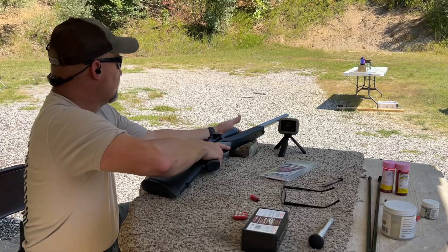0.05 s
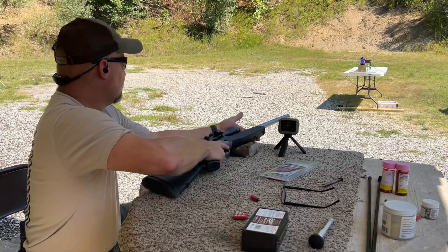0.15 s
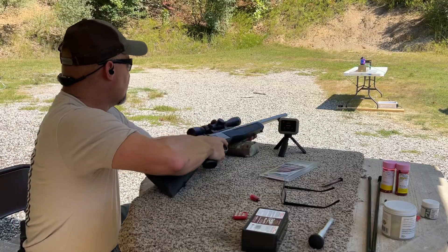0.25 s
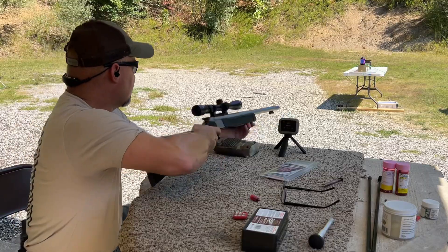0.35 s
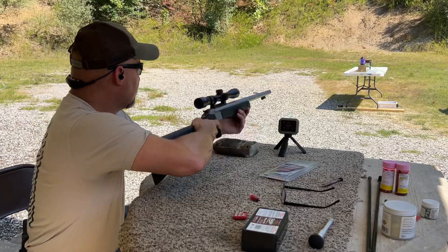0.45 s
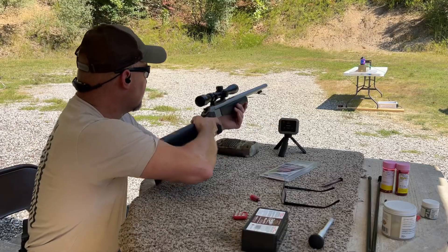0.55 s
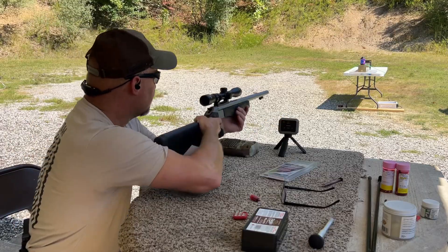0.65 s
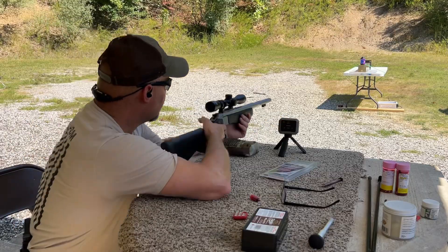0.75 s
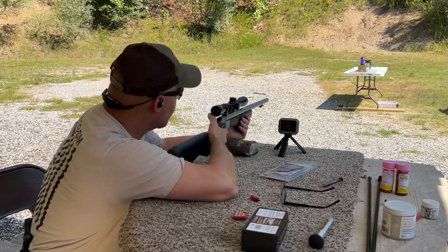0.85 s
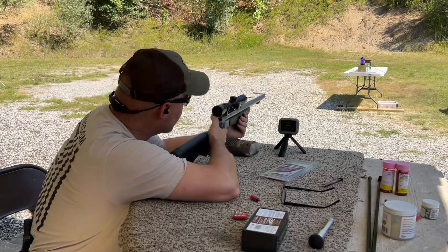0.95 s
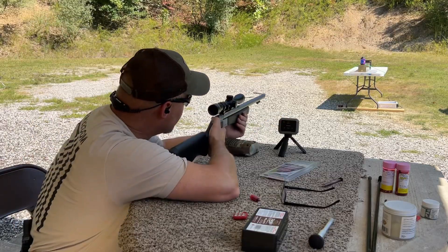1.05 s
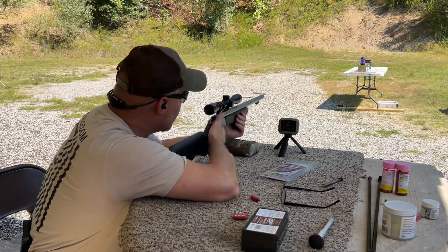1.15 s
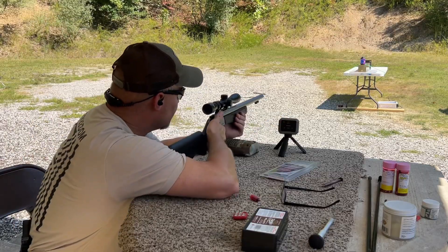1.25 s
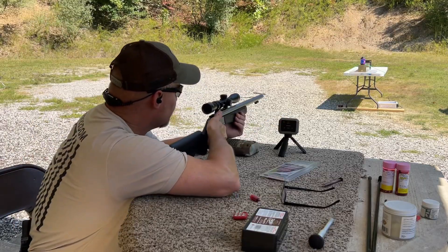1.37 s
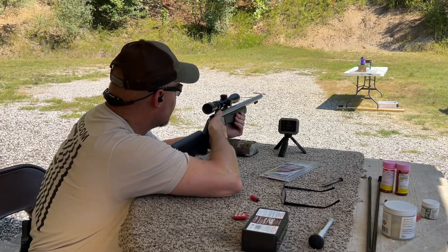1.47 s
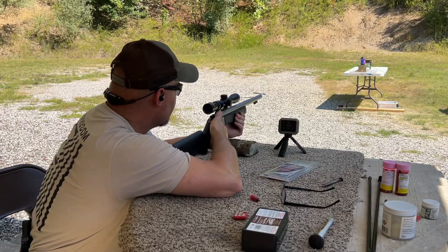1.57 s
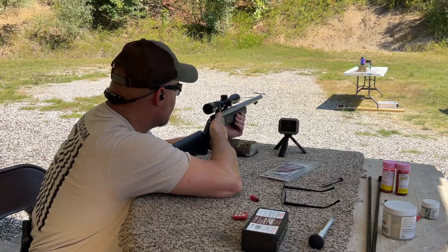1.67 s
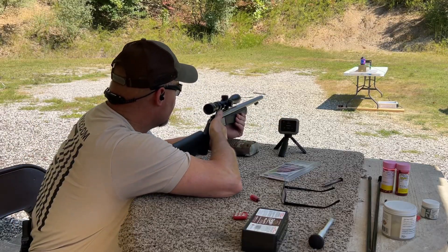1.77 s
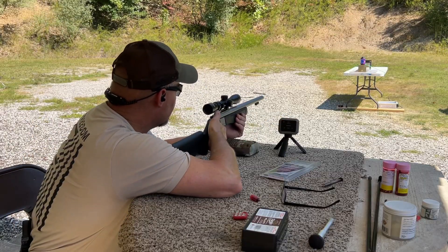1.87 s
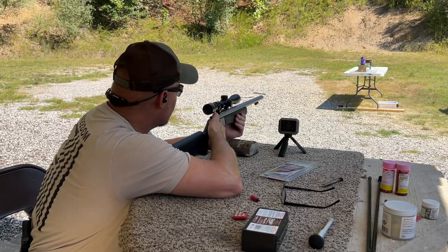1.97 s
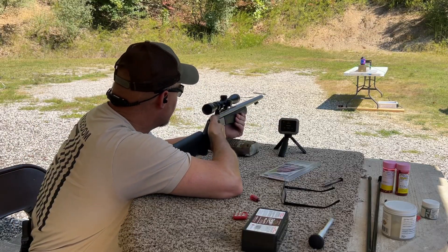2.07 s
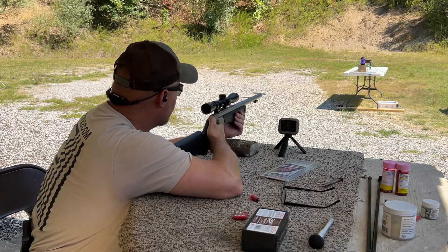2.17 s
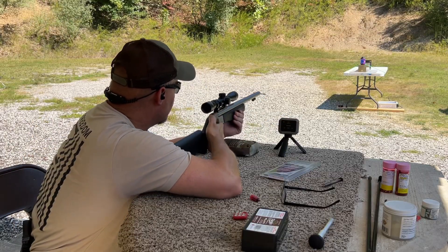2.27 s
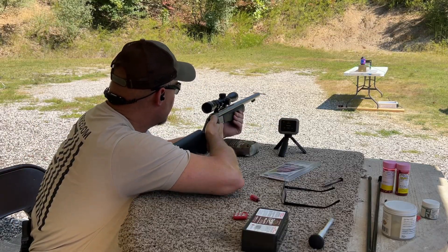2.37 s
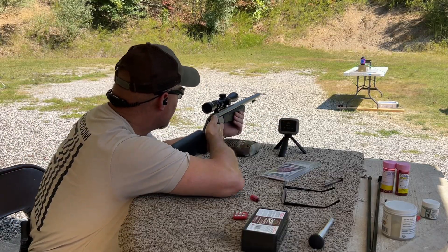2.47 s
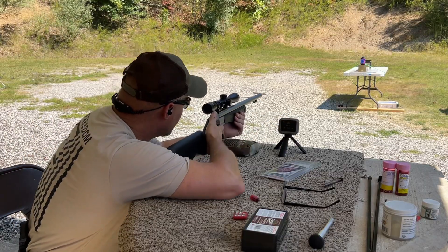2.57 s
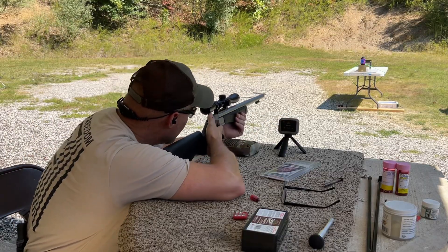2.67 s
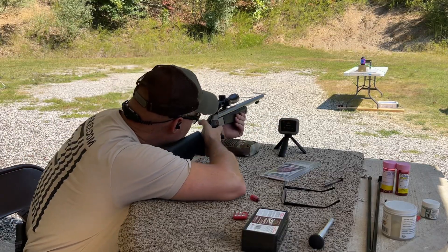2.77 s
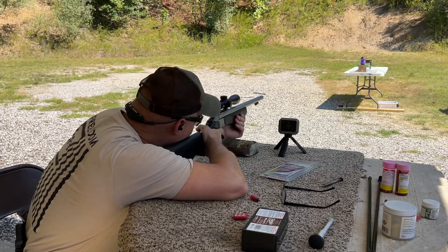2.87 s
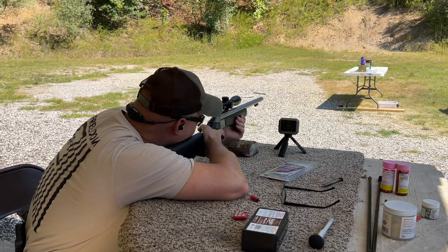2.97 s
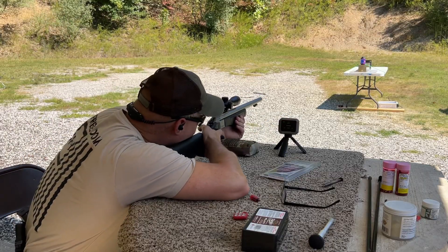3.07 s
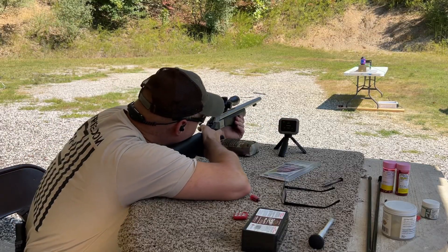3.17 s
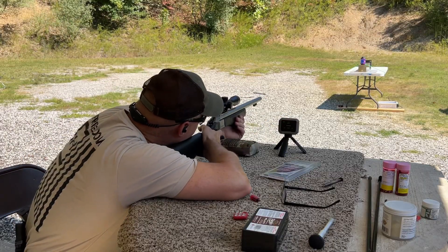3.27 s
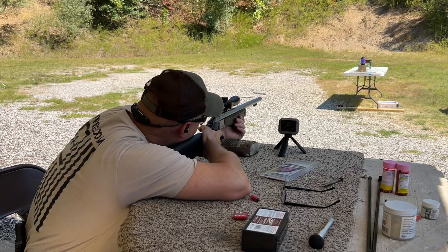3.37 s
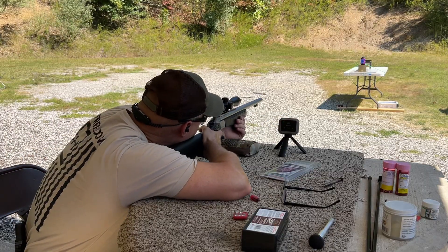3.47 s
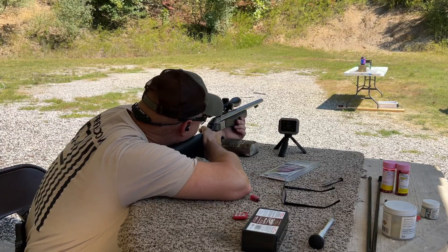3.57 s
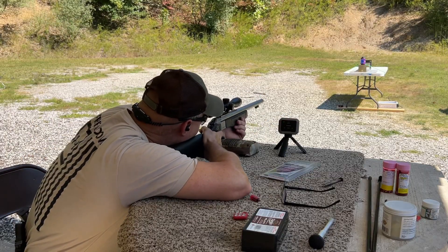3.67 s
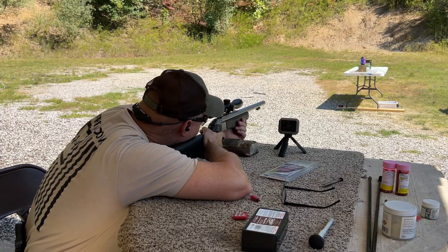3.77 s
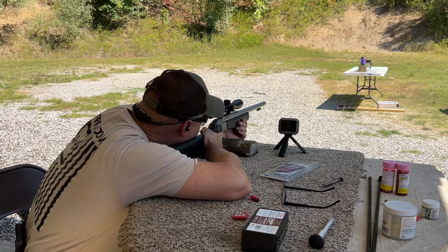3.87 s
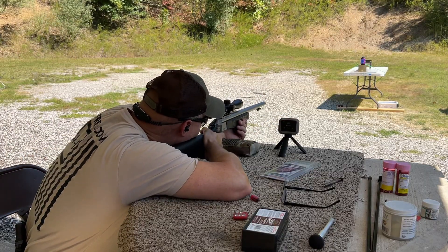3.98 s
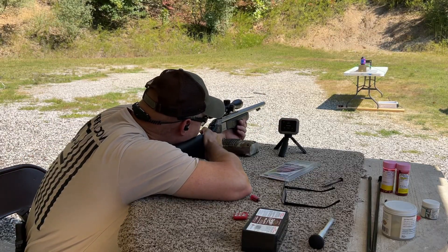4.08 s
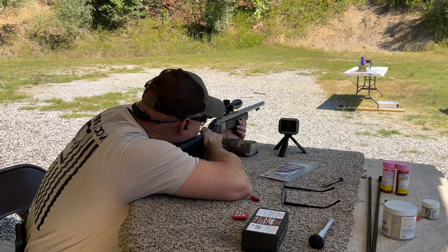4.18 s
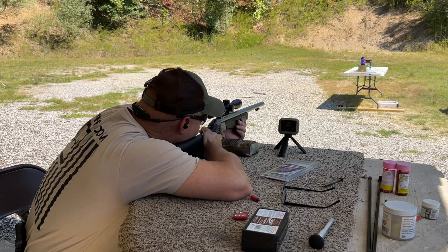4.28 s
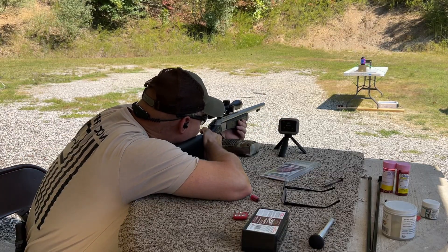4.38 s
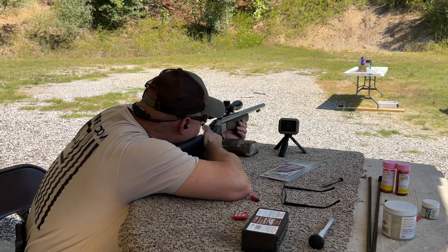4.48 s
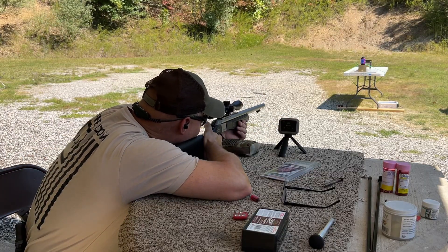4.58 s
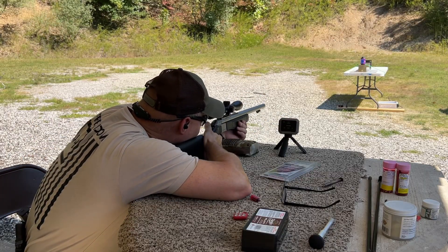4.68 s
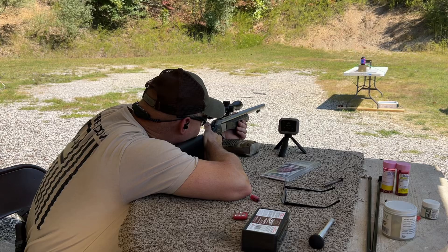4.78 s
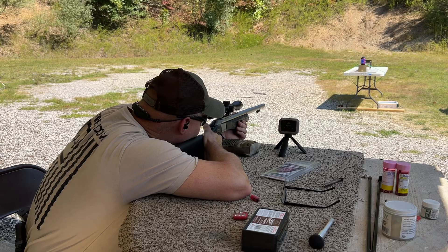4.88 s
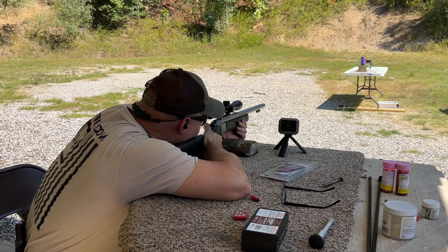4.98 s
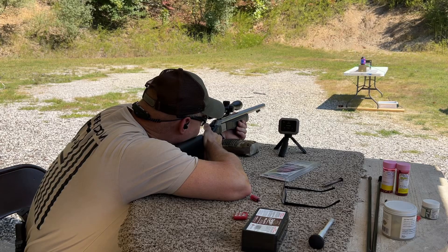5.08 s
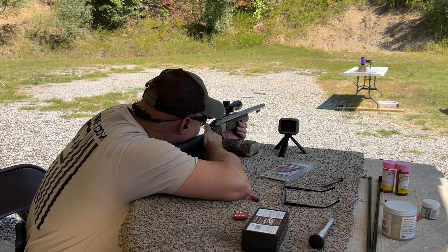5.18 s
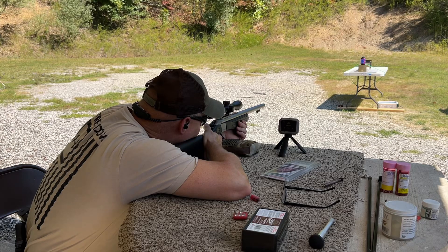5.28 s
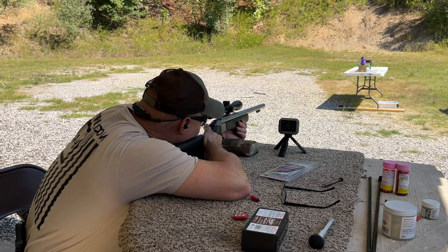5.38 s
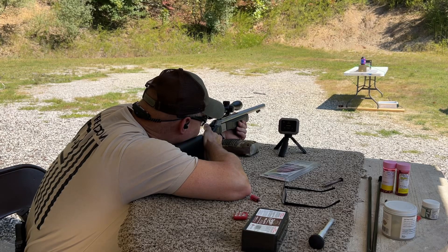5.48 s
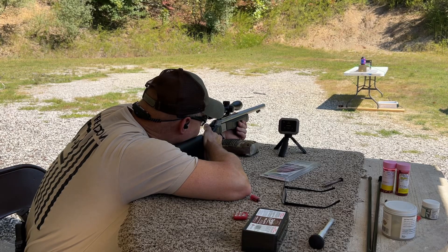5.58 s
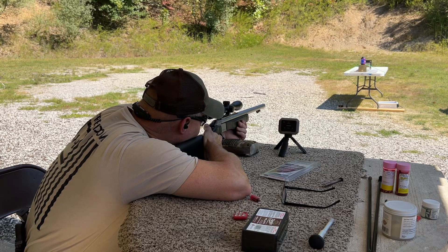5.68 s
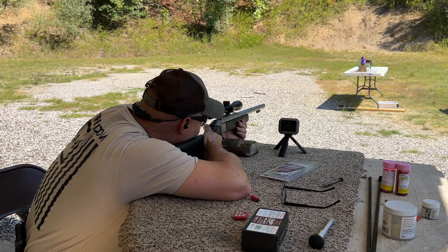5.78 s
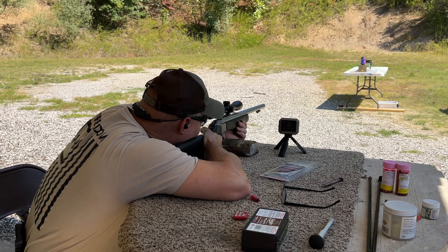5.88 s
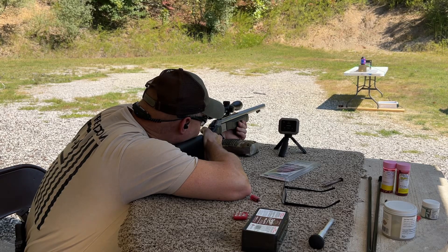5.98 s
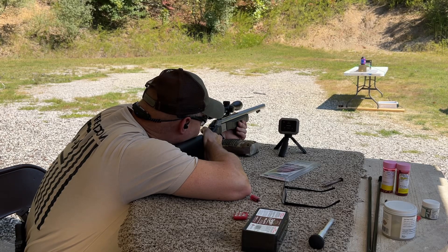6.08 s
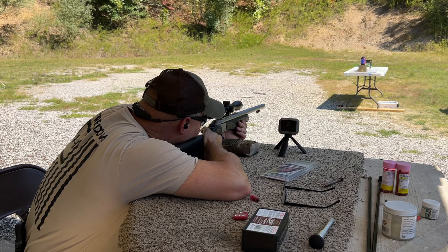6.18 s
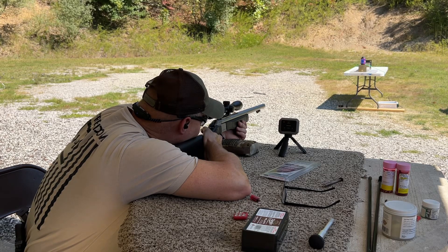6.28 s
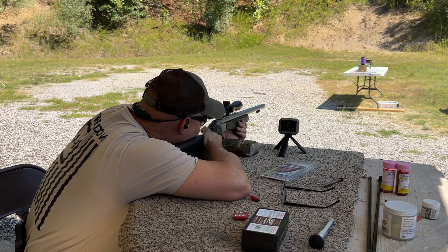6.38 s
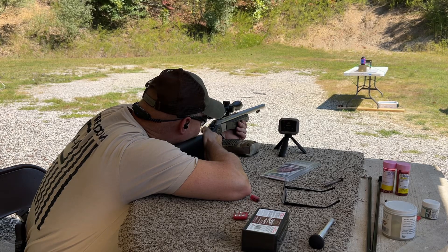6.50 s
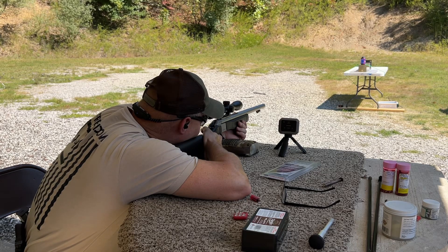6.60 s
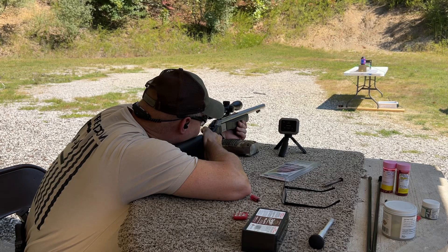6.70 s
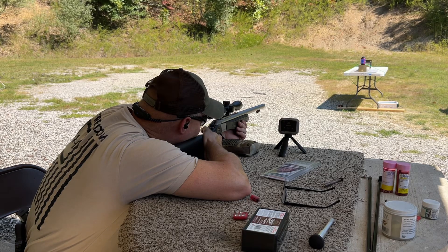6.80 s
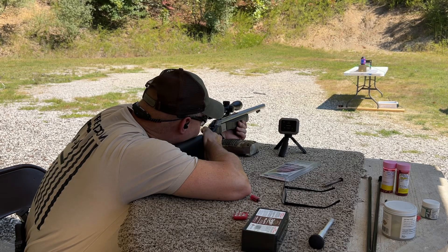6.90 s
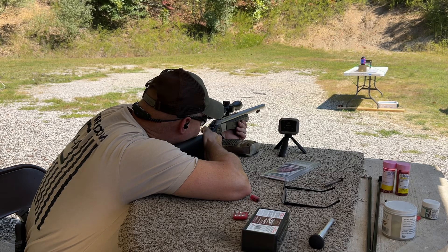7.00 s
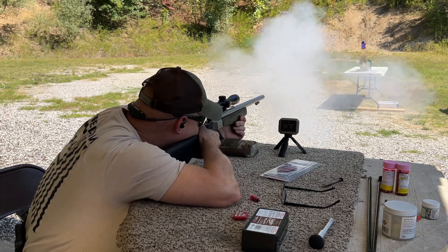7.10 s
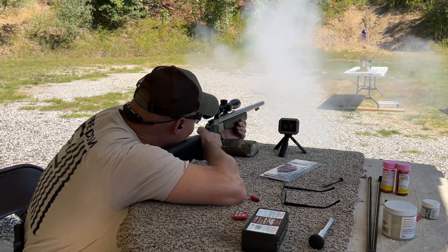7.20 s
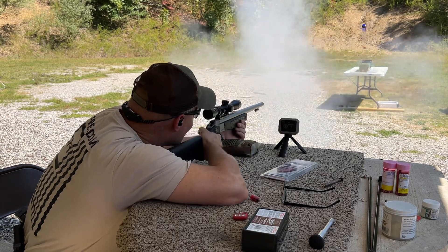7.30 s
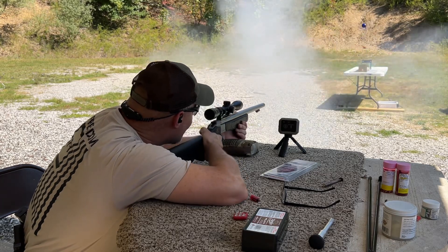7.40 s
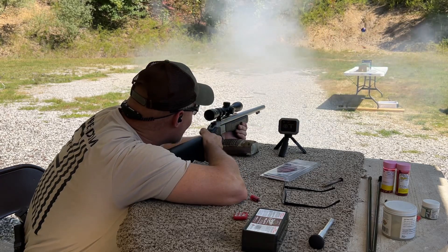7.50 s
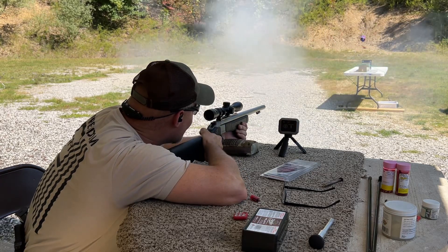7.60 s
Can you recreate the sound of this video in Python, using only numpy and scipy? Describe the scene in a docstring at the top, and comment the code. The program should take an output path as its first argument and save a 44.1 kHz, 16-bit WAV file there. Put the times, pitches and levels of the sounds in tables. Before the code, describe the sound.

A quiet outdoor shooting range heard from beneath a roof, close to the bench. Throughout, katydids hold a shrill, rapid, fluttering trill high in the treble, over distant insect shimmer and very faint air, while a cricket gives short soft chirps roughly every half second. At 0 to 0.2 s the gun stock barely rubs the padded bench; around 0.4 to 0.5 s it scrapes and knocks, the boards giving a hollow woody ring. Faint cloth and small clicks follow near 1.1 to 1.2 s. At 2.13 s the lock cocks with a loud, bright, tight double snap, then duller touches until 2.6 s. Only insects remain, apart from a tiny tick at 6.04 s. Just after 7.0 s a brief crackle precedes a tremendous sharp crack and full, bassy blast at 7.04 s. Shelter and bench resonate, and scattered echoes roll back from the wooded bank, darkening through the end at about 7.7 s, burying the insects.

```python
"""Under the shelter of an outdoor range, katydids trill and a cricket chirps over faint air: tones and noise.
A muzzleloader is lifted off a shooting bench: noise grains scrape and knock, and the boards ring as modes.
The lock is cocked with bright, ringing clicks; some seconds later a quieter crackle comes just ahead of the
crack. The shot's noise blast fills the shelter, bench and roof ring, and a wooded bank rolls it back as
scattered echoes. After the shot the katydids and the outdoor air sink away."""
import sys
import numpy as np
from scipy import signal
from scipy.fft import rfft, irfft
from scipy.io import wavfile

SR = 44100
rng = np.random.default_rng(int(sys.argv[2]) if len(sys.argv) > 2 else 0)


def generate_wav(sig):
    """Save sig (samples, or channels by samples) to the path in sys.argv[1] as 16-bit PCM at SR."""
    pcm = np.round(np.clip(np.atleast_2d(sig).T, -1, 1) * 32767).astype(np.int16)
    wavfile.write(sys.argv[1], SR, pcm)


N = 337365
TIME = np.arange(N) / SR
SHOT_S = 7.0363
# Modes of the bench boards. Each row: pitch in Hz, level in dB, t60 in s before any added damping.
BENCH_MODES = [(184.4, 0.3, 0.38), (396, -11.5, 0.5), (548, -14, 0.43), (597, 2, 0.053), (631, -12, 0.48),
               (693, -27, 0.28), (775, -4.5, 0.2), (845, -19.5, 0.73), (1040, -26.5, 0.77),
               (1215, -12, .19), (1330, -22, 0.52), (1670, -24.5, 0.56), (2150, -23, 0.26)]


def undb(db):
    """Amplitude factor of a level in dB."""
    return 10 ** (np.asarray(db) / 20)


def unit(x):
    """Scale to rms 1."""
    return x / np.sqrt(np.mean(x ** 2))


def spectrum_db(points, hz):
    """Read a colour of (Hz, dB) points, joined by straight lines over log frequency."""
    point_hz, point_db = np.transpose(points)
    return np.interp(np.log(hz + 1), np.log(point_hz), point_db)


def tint(x, points):
    """Give a steady texture a colour and rms 1."""
    size = 2 ** 19
    gain = undb(spectrum_db(points, np.fft.rfftfreq(size, 1 / SR)))
    return unit(irfft(rfft(x, size) * gain)[:len(x)])


def filtered(x, hz, kind="low", order=2):
    """Butterworth filter with its edge or edges in Hz."""
    sos = signal.butter(order, np.minimum(hz, .45 * SR), kind, fs=SR, output="sos")
    return signal.sosfilt(sos, x)


def noise():
    """White noise over the whole scene."""
    return rng.standard_normal(N)


def grains(per_s, spread_db):
    """Dense little impulses of uneven size."""
    struck = rng.random(N) < per_s / SR
    return unit(struck * noise() * undb(spread_db * noise()))


def walk(rate):
    """Smooth chance, spread near 1, with `rate` new values a second; the last of 2000 is held."""
    return 1.2 * np.interp(TIME * rate, np.arange(2000), rng.standard_normal(2000))


def fade(t60, rise=0.0001, hold=0):
    """One second of a quick rise, a hold and an exponential fall of 60 dB in t60 (all in s)."""
    t = TIME[:SR]
    falling_s = np.maximum(t - rise - hold, 0)
    return np.minimum(t / rise, 1) * np.exp(-np.log(1000) * falling_s / t60)


def ring(modes, rise):
    """One second of a struck body: decaying sines, where 0 dB means rms 1 before the fall."""
    tones = 0
    for hz, db, t60 in modes:
        tones += undb(db) * fade(t60, rise) * np.sin(2 * np.pi * (hz * TIME[:SR] + rng.random()))
    return np.sqrt(2) * tones


def piece(texture):
    """Any one second of a texture."""
    start = rng.integers(N - SR)
    return texture[start:start + SR]


def add(out, s, x):
    """Mix x into out from second s."""
    start = max(int(s * SR), 0)
    out[start:start + len(x)] += x[:N - start]


def echoed(x, wet_db, t60, delay):
    """The direct sound and a scatter of fading reflections."""
    tail = piece(grains(4000, 1)) * fade(t60)
    reflections = signal.fftconvolve(x, tail / np.linalg.norm(tail))[:N]
    out = x.copy()
    add(out, delay, undb(wet_db) * reflections)
    return out


def sinking(start_s, db_per_s):
    """Full gain until start_s, then a steady fall."""
    return undb(-db_per_s * np.maximum(TIME - start_s, 0))


def report(crack_db=-7, hold_s=0.0021, crack_t60=0.0068, bench_db=-14, roof_db=-25.5):
    """A quieter crackle, then the muzzle cracks, and the blast fills the shelter and shakes it."""
    # Two short bursts of crackle ahead of the crack. Each row: start in s, level in dB, hold in s.
    crackle_bursts = [(7.015, -24.5, .012), (7.032, -22, .002)]
    # Colours of crackle and crack. Each row: frequency in Hz, relative level in dB per Hz.
    crackle_colour = [(35, -41), (60, -17), (1100, -1), (1830, -11), (2980, -15), (3760, -6), (4320, -12.5),
                      (8090, -11), (15500, -23)]
    crack_colour = [(100, -8), (700, -21), (1800, -1.5), (3000, -9), (7000, -13), (11000, -17),
                    (15500, -25)]
    # Modes of the shelter roof. Each row: pitch in Hz, level in dB, t60 in s.
    roof_modes = [(97, -22, 0.19), (240.3, -9.5, 0.65), (318, 2.5, 0.3), (395, 6.5, 0.23), (549, -7, 0.18),
                  (710, 1.5, 0.28), (853, -16, 0.23), (866, -2, 0.29), (927, -6, 0.73), (1246, -8, 1),
                  (1374, -14.5, 1), (1510, -6, 0.32)]
    out = np.zeros(N)
    crackle = tint(noise(), crackle_colour) * undb(1.3 * walk(600))
    for s, db, hold in crackle_bursts:
        add(out, s, undb(db) * fade(t60=0.037, rise=0.00036, hold=hold) * piece(crackle))
    # the shock front holds its full pressure for about two milliseconds
    crack = fade(crack_t60, hold=hold_s) * piece(tint(noise(), crack_colour))
    add(out, SHOT_S, undb(crack_db) * crack)
    add(out, SHOT_S, blast())
    # the shooter's weight on the bench damps its boom
    boom = filtered(ring(BENCH_MODES, rise=0.023), 300) * fade(0.75)
    add(out, SHOT_S, undb(bench_db) * boom)
    add(out, SHOT_S, undb(roof_db) * ring(roof_modes, rise=0.05))
    return out


def blast(blast_db=-11, blast_t60=0.17, shelter_db=-26.5, shelter_t60=1, rise_s=0.017, hold_s=0.029):
    """Reflections pile up under the roof, hold a moment, and drain away: fast at first, then slowly."""
    # Colour of the blast. Each row: frequency in Hz, relative level in dB per Hz.
    blast_colour = [(21, -49), (35, -16), (166, -6), (276, -8), (394, -9.5), (624, -11), (709, -11.5),
                    (1010, -9.5), (1150, -10), (1340, -10), (1560, -12.5), (3530, -20.5), (6860, -24.5),
                    (15500, -37.5)]
    direct = 0.36  # share of the pressure that arrives straight from the muzzle
    build = direct + (1 - direct) * np.minimum(TIME[:SR] / rise_s, 1) ** 2
    full_s = rise_s + hold_s
    fast = undb(blast_db) * fade(blast_t60, hold=full_s)
    slow = undb(shelter_db) * fade(shelter_t60, hold=full_s)
    return build * np.hypot(fast, slow) * piece(tint(grains(14000, 2.7), blast_colour))


def bank(air_db_per_s=35, air_power=0.85, middle_s=7.32):
    """Thousands of small echoes; the later they arrive, the more treble the air has taken."""
    # Colour of the wooded bank. Each row: frequency in Hz, relative level in dB per Hz.
    bank_colour = [(21, -47), (35, -24), (53, -19), (75, -0.5), (262, -12), (365, -4.5), (426, -2),
                   (624, -5.5), (826, -2.5), (1180, -7), (1270, -6.5), (5450, -22), (10600, -37),
                   (15500, -68)]
    # Single echoes that stand out. Each row: start in s, level in dB, upper edge in Hz, t60 in s.
    clear_echoes = [(7.216, -21.5, 175, 0.054), (7.312, -26, 110, 0.29), (7.36, -23, 2500, 0.032),
                    (7.404, -26, 110, 0.15), (7.461, -26, 456, 0.19)]
    scatter, out = tint(grains(9000, 0.57), bank_colour), np.zeros(N)
    edges = np.geomspace(500, 14000, 9)
    below = []
    for hz in edges:
        sos = signal.butter(4, hz, fs=SR, output="sos")
        below.append(signal.sosfiltfilt(sos, scatter, padtype="even"))
    # neighbouring low-passes differ by one band; the top band takes all the rest
    bands = np.diff([np.zeros(N)] + below[:-1] + [scatter], axis=0)
    late_s = np.maximum(TIME - middle_s, -.22)
    for hz, band in zip(edges, bands):
        loss_db_per_s = air_db_per_s * (hz / 5500) ** air_power
        out += band * undb(-loss_db_per_s * late_s)
    out *= roll()
    for s, db, hz, t60 in clear_echoes:
        echo = unit(filtered(piece(scatter), hz, order=3))
        add(out, s, undb(db) * fade(t60, rise=0.0046) * echo)
    return out


def roll(sound_m_s=343):
    """Each slope's echo swells up to its round-trip time and dies away; their powers add."""
    # Wooded slopes. Each row: distance in m, level in dB, spread of the first arrivals in s, t60 in s.
    wooded_slopes = [(33.4, -33.5, 0.051, 0.74), (59.1, -25, 0.081, 2.34), (73.3, -28, 0.042, 1.56)]
    power = np.zeros(N)
    for metres, db, spread, t60 in wooded_slopes:
        late = TIME - SHOT_S - 2 * metres / sound_m_s
        swell = np.exp(-.5 * (late / spread) ** 2)
        fall = np.exp(-np.log(1000) * np.abs(late) / t60)
        power += (undb(db) * np.where(late < 0, swell, fall)) ** 2
    return np.sqrt(power) * (TIME > SHOT_S)


def action(snap_t60=0.0082):
    """Steel parts snap home and ring the lock; softer touches are duller; the shelter answers."""
    # Hammer, sear and fingers. Each row: start in s, level in dB, upper edge in Hz, ring in dB re the snap.
    clicks = [(1.132, -56, 1480, -32), (1.159, -45, 3560, -38), (1.223, -52, 5900, -35),
              (2.09, -52, 2600, -33), (2.1328, -21, 14000, -25), (2.1342, -18, 14000, -21.5),
              (2.3343, -44, 1960, -25.5), (2.4447, -56.5, 3200, -23), (2.579, -60, 2200, -35),
              (6.0377, -58, 6500, -30)]
    # Colour of a snap. Each row: frequency in Hz, relative level in dB per Hz.
    click_colour = [(150, -52), (550, -28), (820, -12), (1300, -8.5), (1800, -12), (3100, -0.5),
                    (4400, -3.5), (6000, -3.5), (8300, 5), (11000, -5), (15500, -7)]
    # Modes of the steel lock. Each row: pitch in Hz, level in dB, t60 in s.
    lock_modes = [(915, -5, .07), (1800, -11, .05), (2760, -9, .05), (3240, -6, .045), (4220, -4, .05),
                  (4960, -7, .05), (5760, -7, .06), (7950, -4, .06), (8770, -4, .06), (10640, -8, .05)]
    out, snap = np.zeros(N), tint(noise(), click_colour)
    for s, db, hz, ring_db in clicks:
        strike = fade(snap_t60) * piece(snap) + undb(ring_db) * ring(lock_modes, rise=0.00046)
        steady_level = np.std(filtered(snap[:SR], hz, order=4))
        add(out, s, undb(db) * filtered(strike, hz, order=4) / steady_level)
    out = filtered(out, 710, "high", order=5)  # small parts radiate no bass
    # bench and shooter reflect at once; the roof answers later and duller
    near = echoed(out, wet_db=-7.5, t60=.08, delay=.002)
    roof = echoed(out, wet_db=-10, t60=.2, delay=.009) - out
    return near + filtered(roof, 6000)


def handling(body_db=-10, body_t60=0.62, boom_rise_s=0.034, boom_hold_s=0.2, boom_t60=0.27):
    """The stock slips and bumps on the padded bench and the boards ring on; cloth slides along."""
    # Stock and arms on the bench. Each row: start in s, rub in dB, rise in s, t60 in s,
    # lower edge in Hz, upper edge in Hz, bench ring in dB.
    bumps = [(.002, -49.5, 0.00091, 0.45, 127, 714, -65), (.13, -58.5, 0.0075, 0.42, 123, 390, -64),
             (.376, -36.5, 0.021, 0.15, 560, 700, -67), (.394, -38.5, 0.0053, 0.15, 500, 1700, -62),
             (.409, -33, 0.0013, 0.18, 60, 6000, -40), (0.435, -33.5, .004, 0.14, 60, 2000, -48),
             (.461, -28, 0.00079, 0.22, 153, 2240, -28.5), (0.488, -41, .001, 0.085, 60, 1800, -47),
             (1.132, -47, .002, 0.12, 905, 1220, -70.5)]
    # Colour of the rubbing stock. Each row: frequency in Hz, relative level in dB per Hz.
    rub_colour = [(30, -60), (55, -14), (105, -0.5), (183, -5.5), (290, -11.5), (450, -7.5), (620, -8.5),
                  (880, -8.5), (1050, -8), (1450, -18.5), (2150, -24.5), (3100, -33), (7000, -27.5),
                  (15500, -38)]
    # Sleeves and hands sliding. Each row: middle in s, level in dB, length in s.
    rustles = [(0.197, -63.5, 0.18), (0.414, -51, 0.05), (0.82, -66.5, 0.33), (1.138, -57.5, 0.016),
               (1.22, -59, 0.11), (2.61, -69, 0.031)]
    cloth_colour = [(30, -43), (100, -7), (500, 7.5), (1000, 7.0), (2000, -0.5), (4200, -3.5),
                    (9000, -9.5), (15000, -10.5)]  # Hz, relative dB per Hz
    out, rub = np.zeros(N), tint(grains(7000, 0.9), rub_colour)
    for s, db, rise, t60, low_hz, high_hz, ring_db in bumps:
        contact = filtered(piece(rub), np.sort([low_hz, high_hz]), "band")
        add(out, s, undb(db) * fade(t60, rise) * unit(contact))
        # the lowest mode swells slowly, rings at its own pace for a while, then falls faster
        boom = ring(BENCH_MODES[:1], rise=boom_rise_s) * fade(boom_t60, hold=boom_hold_s)
        # between the clear modes, many weak ones blur into a woody tail
        woody_tail = undb(body_db) * fade(body_t60, rise=0.0047) * piece(rub)
        body = boom + ring(BENCH_MODES[1:], rise=0.02) + woody_tail
        add(out, s, undb(ring_db) * filtered(body, high_hz))
    cloth = tint(grains(2500, 0.51), cloth_colour)
    strokes = sum(undb(db) * np.exp(-((TIME - s) / length) ** 2) for s, db, length in rustles)
    return out + cloth * strokes


def cricket():
    """Each wing stroke swells, then sags in pitch as the file slows; no two are quite alike."""
    # Chirps. Each row: time in s, level in dB.
    chirps = [(.047, -62), (0.53, -65), (0.92, -61), (1.341, -65), (1.757, -61.5), (2.26, -59.5),
              (2.867, -62), (3.334, -61), (3.8, -58), (4.304, -60), (4.78, -59), (5.232, -59.5),
              (5.686, -56.5), (6.113, -57.5), (6.597, -58)]
    # Wing strokes of one chirp. Each row: delay in s, length in s, mean pitch in Hz, mean level in dB re chirp.
    wing_strokes = [(-.031, .01, 4400, -15), (-.005, .019, 4480, -2), (.032, .023, 4570, 0),
                    (.076, .023, 4560, 0)]
    out = np.zeros(N)
    for s, db in chirps:
        for delay, length, hz, stroke_db in wing_strokes:
            detune, force_db = rng.standard_normal(2)
            u = np.linspace(0, 1, int(length * SR))  # progress through the stroke
            pitch = hz * (1 + .008 * detune) * (1 - .17 * (u - .3) ** 2)
            swell = np.abs(np.sin(np.pi * u ** 1.6)) ** .7
            tone = np.sqrt(2) * swell * np.sin(2 * np.pi * np.cumsum(pitch) / SR)
            add(out, s + delay, undb(db + stroke_db + force_db) * tone)
    return echoed(out, wet_db=-6.5, t60=.3, delay=.004)


def katydid(trill_hz=26.92, rasp_hz=45):
    """Unbroken trills, nearly in step: every wing closure is a rasping tone that slides down and fades."""
    # Singers. Each row: first stroke in s, top pitch in Hz, sag scale in Hz, level in dB before tiring.
    trills = [(0.01513, 8730, 1200, -59), (0.018, 8030, 350, -70), (0.0033, 7560, 140, -71.5),
              (0.018, 6950, 180, -81)]
    out = np.zeros(N)
    for first_s, top_hz, sag_hz, db in trills:
        u = ((TIME - first_s) * trill_hz + .012 * walk(4)) % 1  # progress through the stroke
        pitch = top_hz - 2 * sag_hz * np.maximum(u - .36, 0) ** 1.3 + rasp_hz * walk(300)
        stroke = np.interp(u, [.05, .17, .35, .5, .75, 1], [.02, .9, 1, .42, .17, .01])
        stroke = stroke * undb(.7 * walk(200))
        tone = stroke * np.sin(2 * np.pi * np.cumsum(pitch) / SR)
        out += undb(db) * unit(echoed(tone, wet_db=-13, t60=.06, delay=.002))
    # they sing evenly, then slowly weaken
    return out * sinking(start_s=3.3, db_per_s=1.0)


def outdoors(chorus_db=-64, air_db=-64.0):
    """Far insects flutter, each group at its own pitch, above soft, slowly swelling air."""
    # Colours of far insects and outdoor air. Each row: frequency in Hz, relative level in dB per Hz.
    chorus_colour = [(3530, -46), (6000, -15), (6220, -24.5), (6470, -21.5), (7300, -11), (8200, -16),
                     (8330, -11), (8460, 6.5), (8600, 4.5), (11200, -51), (18900, -120)]
    air_colour = [(25, -17), (45, -23), (65, 4), (100, -1.5), (170, -10), (300, -10), (520, -5),
                  (800, -7.5), (1200, -16.5), (2000, -22.5), (3500, -20), (5500, -24), (10000, -25),
                  (13000, -24), (15500, -20)]
    buzz, edges = tint(noise(), chorus_colour), np.linspace(6200, 8400, 9)
    chorus = 0
    for band in zip(edges, edges[1:]):
        chorus += filtered(buzz, np.array(band), "band", order=3) * undb(3 * walk(55))
    air = undb(air_db + 0.34 * walk(2.08)) * tint(noise(), air_colour)
    return undb(chorus_db) * unit(chorus) + air


def scene():
    """Shot, echoes, handling and insects in one channel; katydids and air sink away after the shot."""
    background = (katydid() + outdoors()) * sinking(SHOT_S, db_per_s=38)
    return (report() + bank() + handling() + action() + cricket() + background)[None]


def record(dry, top_hz=15850):
    """The microphone sheds the deepest bass, rounds the loudest peaks and cuts the top."""
    pressed = 0.96 * np.tanh(filtered(dry, 56, "high", order=4) / 0.92)
    return signal.sosfilt(signal.ellip(10, .2, 80, top_hz, fs=SR, output="sos"), pressed)


dry = scene()
out = record(dry)
generate_wav(out)
```